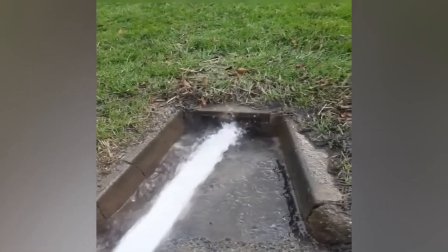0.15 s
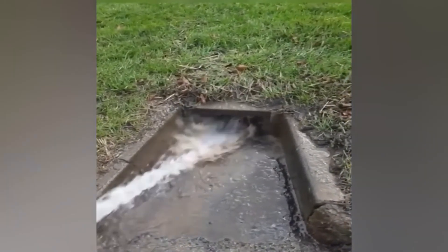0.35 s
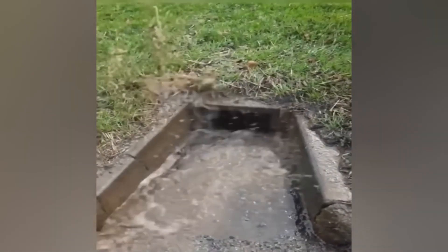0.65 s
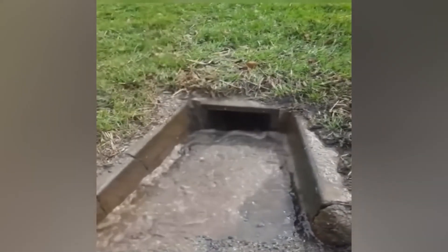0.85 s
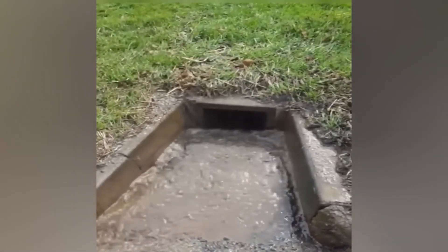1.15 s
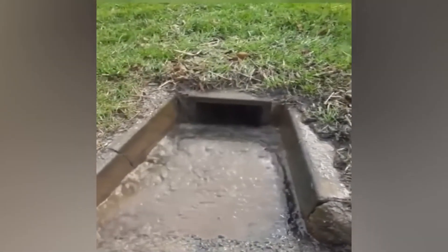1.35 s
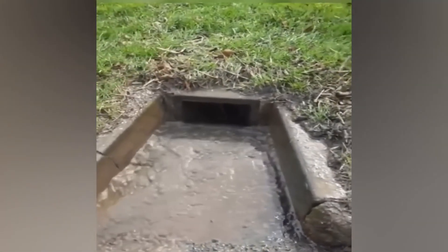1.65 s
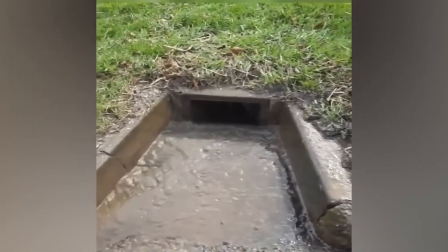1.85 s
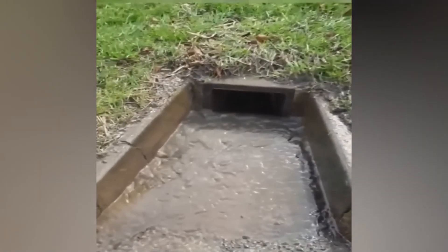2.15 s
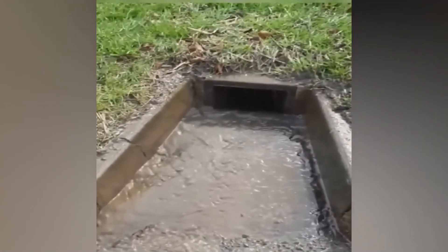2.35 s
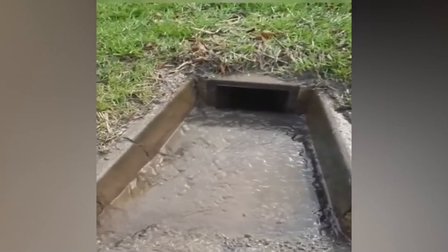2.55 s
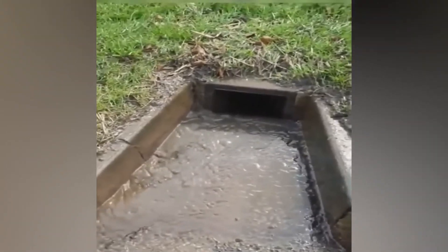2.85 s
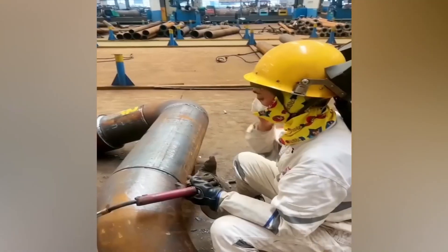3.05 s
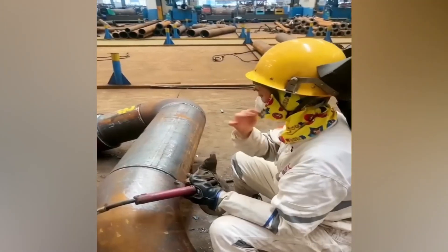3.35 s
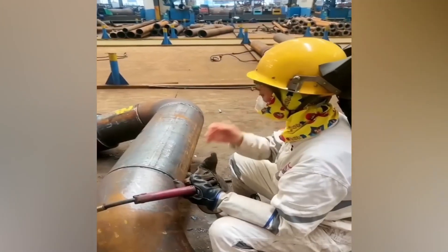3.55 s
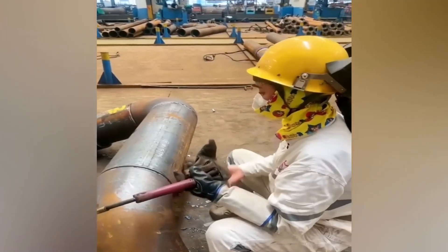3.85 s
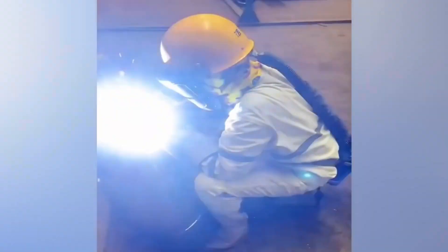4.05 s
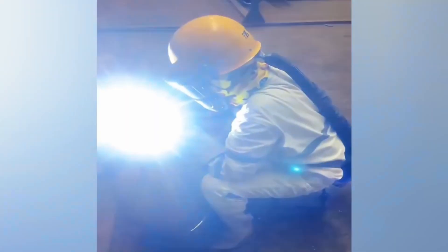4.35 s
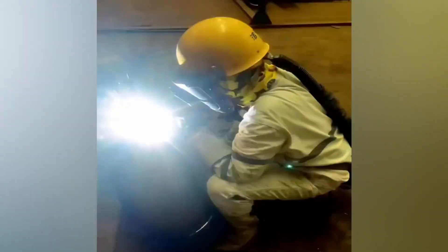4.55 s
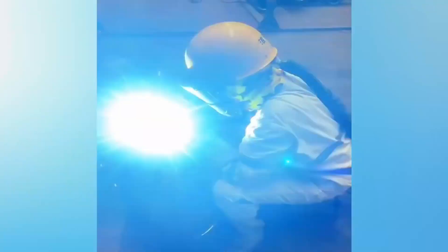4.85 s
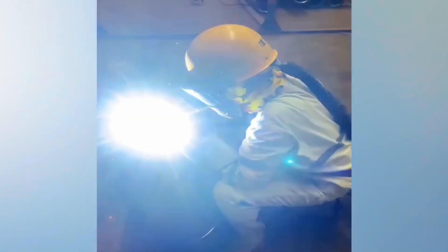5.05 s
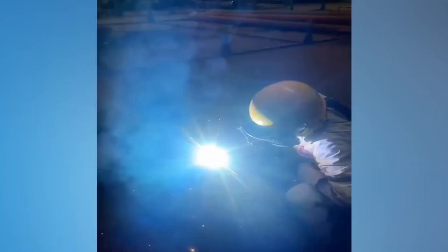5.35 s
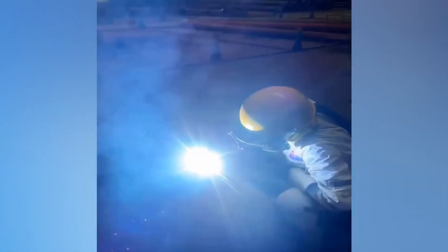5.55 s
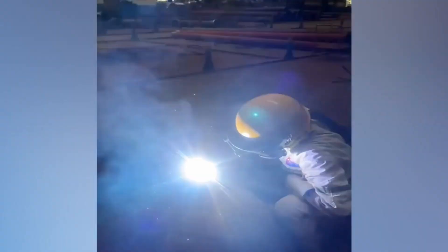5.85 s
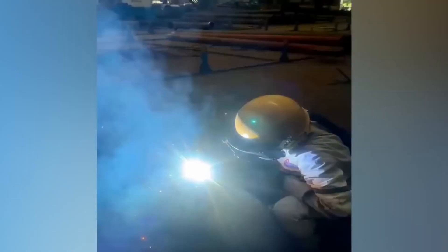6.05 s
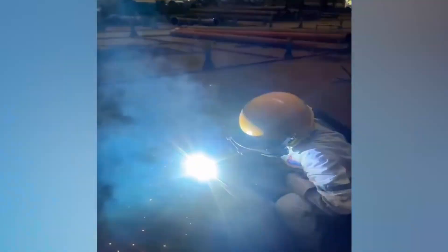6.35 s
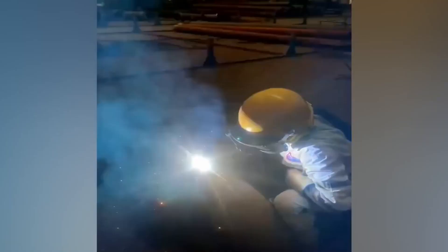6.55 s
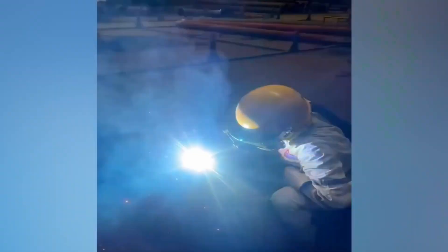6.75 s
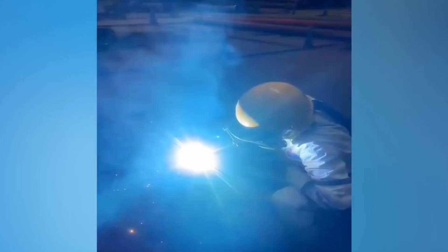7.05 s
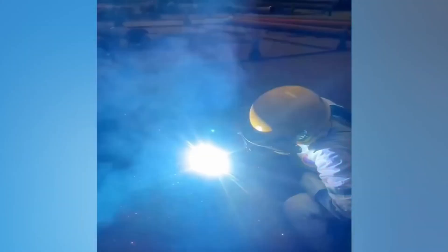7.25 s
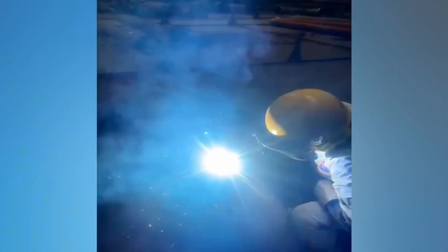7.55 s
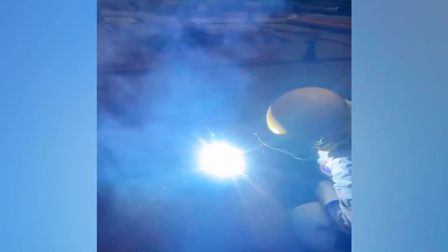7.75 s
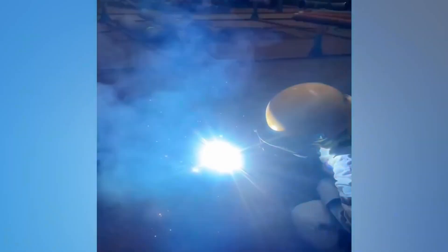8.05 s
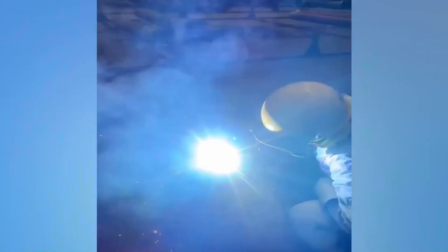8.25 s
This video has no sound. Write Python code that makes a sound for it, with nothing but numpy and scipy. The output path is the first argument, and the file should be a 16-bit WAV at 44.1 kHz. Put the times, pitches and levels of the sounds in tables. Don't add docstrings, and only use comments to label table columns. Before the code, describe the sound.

Loud wide-band spray, stronger on the right, covers engine and pump drone that slowly eases. After a brief dip and cut, a subdued hall rumbles with fans and motors for a second. Welding starts close by: hiss, sizzle and rapid irregular snaps. Another cut moves the microphone back, where the arc becomes smooth, bright hissing with only occasional clicks, in mono.

```python
import sys
import numpy as np
from scipy import signal
from scipy.fft import rfft, irfft, next_fast_len
from scipy.io import wavfile
from scipy.ndimage import uniform_filter1d

SR = 44100
rng = np.random.default_rng(int(sys.argv[2]) if len(sys.argv) > 2 else 0)


def store_wav(level_fs):
    pcm = np.round(np.clip(np.atleast_2d(level_fs), -1, 1) * 32767)
    wavfile.write(sys.argv[1], SR, pcm.T.astype(np.int16))


def gain_from_db(level_db):
    decades = np.asarray(level_db, float) / 20
    return 10 ** decades


N = 370440
CUT_S, STRIKE_S, STEP_BACK_S = 2.9255, 3.936, 5.457


def unit(x):
    return x / np.sqrt(np.mean(x ** 2) + 1e-20)


def along(points, hz):
    f, v = np.transpose(points)
    return np.interp(np.log(hz + 1), np.log(f + 1), v)


def curves(rows):
    s, *columns = np.transpose(rows)
    t = np.arange(N) / SR
    return [np.interp(t, s, column) for column in columns]


def pieces(rows):
    rows, t = np.array(rows), np.arange(N) / SR
    latest = np.clip(np.searchsorted(rows[:, 0], t) - 1, 0, None)
    row = rows[latest]
    return row[:, 1:].T, t - row[:, 0]


def wobble(rate, step=1):
    knots = rng.standard_normal(int(N * rate / SR) + 4)
    smooth = signal.resample_poly(knots, 8, 1)
    places = np.arange(0, N, step) * 8 * rate / SR
    return np.interp(places, np.arange(len(smooth)), smooth)


def blurred(field, bands, frames):
    return uniform_filter1d(uniform_filter1d(field, size=bands, axis=0), size=frames, axis=1)


def filtered(x, response):
    m = next_fast_len(N + 8192)
    return irfft(rfft(x, m) * response(np.fft.rfftfreq(m, 1 / SR)), m)[..., :N]


def rush(spectrum, patchy_db, crackle_db, channels=1):
    z = signal.stft(rng.standard_normal((channels, N)), nperseg=512)[2]
    patches = unit(blurred(rng.standard_normal(z.shape[1:]), 6, 10))
    noise = signal.istft(z * gain_from_db(patchy_db * patches), nperseg=512)[1][:, :N]
    noise = noise * gain_from_db(crackle_db * wobble(900))
    return unit(filtered(noise, lambda hz: gain_from_db(along(spectrum, hz))))


def hum(hz, width_hz):
    pitch = np.repeat(hz + width_hz * wobble(20, step=64), 64)[:N]
    size = np.repeat(gain_from_db(.8 * wobble(6, step=64)), 64)[:N]
    return np.sqrt(2) * size * np.sin(2 * np.pi * (np.cumsum(pitch) / SR + rng.random()))


# f/Hz, level/dB per Hz
SPRAY = [(5000, -34), (8500, -26), (9560, -9), (11600, -1), (12500, -3), (13900, -2.5), (15600, -15)]
NOZZLE = [(2120, -12.5), (3600, -7), (5030, -6.5), (6260, 0), (7620, -4.5), (8270, -9.5), (9200, -13),
          (12000, -27), (20200, -120)]
SPLASH = [(350, -16), (600, -3), (650, -9.5), (761, -4.5), (858, -6.5), (1290, -5), (2240, 1), (4000, -3),
          (5200, -9), (8800, -120)]
# t/s, level/dB
PRESSURE = [(0.0, -28), (0.33, -26), (0.48, -20.5), (0.54, -23), (1.17, -25), (1.23, -23), (2.77, -24),
            (2.86, -23)]


def jet():
    t = np.arange(N) / SR
    force_db = curves(PRESSURE)[0] - np.median(np.array(PRESSURE)[:, 1])
    swing_s, swing_takes_s = .47, .25
    turned = np.clip((t - swing_s) / swing_takes_s + .5, 0, 1)
    gush_s, rise_s, fall_s = 0.466, 0.059, 0.064
    gush = np.exp(-((t - gush_s) / np.where(t < gush_s, rise_s, fall_s)) ** 2)

    def strength_db(before, after, lift):
        swing_db = before + (after - before) * turned
        return swing_db + lift * gush + 0.61 * force_db * turned + 0.59 * wobble(5.15)

    spray_db = strength_db(-30.5, -23, lift=3)
    nozzle_db = strength_db(-29.5, -27, lift=4.5)
    splash_db = strength_db(-32.5, -34, lift=5)
    surge = 0.33 * wobble(14) + 0.49 * wobble(70)
    pair = gain_from_db(spray_db + surge) * rush(SPRAY, patchy_db=1.0, crackle_db=-1.0, channels=2)
    pair += gain_from_db(nozzle_db + surge + 1.4) * rush(NOZZLE, patchy_db=0.7, crackle_db=0.5, channels=2)
    pair += gain_from_db(splash_db + 0.22 * surge + 1.7) * rush(SPLASH, patchy_db=0.8, crackle_db=1.4, channels=2)
    return pair


# t/s, firing level/dB
TRUCK = [(0, -22.5), (.2, -23), (.7, -26), (1.9, -29), (2.43, -28.5), (2.86, -28.5)]
# f/Hz, level/dB per Hz
RUMBLE = [(15, -53), (25, -52), (59, -12.5), (87, -6), (109, -12.5), (134, -9), (259, -11.5), (320, -16.5),
          (383, -9), (465, -19.5), (900, -26.5), (1170, -51), (1980, -120)]
# multiple of the engine cycle, level/dB
FIRING = [(7, -19), (8, 0), (9, -20), (15, -18), (16, -13), (24, -16), (40, -26)]
# multiple of the pump's turning rate, level/dB
PLUNGER = [(2, -16), (4, -24), (5, -18), (8, -17), (10, -27)]
# f/Hz, width/Hz, level/dB
PANELS = [
    (170.6, 0.24, -11.5),
    (381.7, 4.71, -14.5),
    (785, 5.5, -27),
]


def truck():
    cycle_hz, pump_hz = 10.91, 28.74
    firing_db, = curves(TRUCK)
    nearer_db = firing_db - np.mean(TRUCK, axis=0)[1]
    rumble_db = -34.2 + 1.1 * nearer_db + 1.5 * wobble(3.07)
    lines = sum(gain_from_db(db) * hum(order * cycle_hz, 0.48) for order, db in FIRING)
    lines += sum(gain_from_db(db) * hum(order * pump_hz, 0.81) for order, db in PLUNGER)
    lines += sum(gain_from_db(db) * hum(hz, width_hz) for hz, width_hz, db in PANELS)
    rumble = gain_from_db(rumble_db + 1.5) * rush(RUMBLE, patchy_db=2.8, crackle_db=2, channels=2)
    return gain_from_db(firing_db - 0.2) * lines, rumble


# f/Hz, likeness (0 to 1)
JET_ALIKE = [(60, 1), (180, 1), (550, 0.94), (1650, 0.086), (4970, 0.31), (15000, 0.09)]
# f/Hz, left-right level/dB
JET_LEAN = [(60, -4.5), (150, -2.5), (380, -6.5), (950, -6.5), (2380, -8.0), (5980, -13), (15000, -16)]


def outdoors():
    lines, rumble = truck()
    right, other = jet() + rumble
    alike = lambda hz: np.clip(along(JET_ALIKE, hz), 0, 1)
    left = filtered(right + lines, alike)
    left += filtered(other, lambda hz: np.sqrt(1 - alike(hz) ** 2))
    left = filtered(left, lambda hz: gain_from_db(along(JET_LEAN, hz)))
    return gain_from_db(3.5) * np.array([left, right + lines])


# t/s, level/dB
ARC = [
    [(3.945, -59), (4.0, -53), (4.115, -45), (4.185, -45), (4.427, -43.5), (5.235, -52), (5.44, -49)],
    [(5.47, -41.5), (5.66, -37.5), (5.91, -43), (6.56, -38.5), (6.93, -35), (7.26, -40.5), (7.72, -39.5),
     (8.11, -42), (8.4, -39)],
]
# f/Hz, level/dB per Hz
ARC_NEAR = [(470, -50), (800, -7), (923, -4), (1280, -7.5), (1450, -16), (1740, -4), (2100, -7.5),
            (2850, 0.5), (4100, -9.5), (4830, -1.5), (6020, -2.5), (6500, -14), (7250, -0.5), (10300, -14),
            (11000, -23), (14300, -46), (22000, -120)]
ARC_FAR = [(470, -49), (800, -8.5), (1160, -1.5), (1560, -14), (2030, -4), (2240, -9), (2820, -3),
           (3220, -8.5), (3590, -3.5), (4830, -10), (5820, -4), (6360, -5.5), (8090, -1.5), (9750, -15.5),
           (11000, -14), (14300, -42), (22000, -120)]
# f/Hz, level/dB per Hz
SIZZLE = [(5290, -19), (9000, -8.5), (10200, -11.5), (12100, -10.5), (13100, -4), (14600, -3.5),
          (15200, -0.5), (15600, -10)]


def arc():
    sizzle_db, = curves(ARC[0] + ARC[1])
    t = np.arange(N) / SR
    flicker = wobble(140)
    near = gain_from_db(-37.5 + 1.3 * flicker) * rush(ARC_NEAR, patchy_db=0.4, crackle_db=1.0)[0]
    far = gain_from_db(-39 + 0.64 * flicker) * rush(ARC_FAR, patchy_db=0.3, crackle_db=0.5)[0]
    follows = 0.19
    near = near * gain_from_db(follows * (sizzle_db + 45.5))
    far = far * gain_from_db(follows * (sizzle_db + 39))
    hiss = np.where(t < STEP_BACK_S, near, far)
    sizzle = gain_from_db(sizzle_db + .9 * flicker) * rush(SIZZLE, patchy_db=1.5, crackle_db=1.5)[0]
    return (t > STRIKE_S) * (hiss + sizzle)


# t/s, level/dB, brightness/dB
POPS = [(3.9545, -30, -18), (4.1737, -26, 0), (4.2287, -31, 12), (4.4483, -30, -7), (4.5418, -25, -12),
        (4.591, -22, -17), (4.6584, -24.5, -15), (4.868, -31, -20), (4.7205, -30, -8), (4.9017, -31, -8),
        (4.92, -30, -5), (5.347, -24, -9), (4.986, -27, -16), (5.257, -18, -2), (5.2856, -30, -6),
        (5.345, -17.5, -9), (5.4235, -23.5, -17), (6.0764, -27, -1), (6.1444, -23, 1), (7.269, -27.5, -1),
        (8.0004, -24, 6), (8.2007, -25, 1.5), (8.255, -29, 0), (5.82, -30, 0), (4.698, -31, -8),
        (4.606, -31, -14)]
# touch t/s, level/dB, tear t/s, level/dB, brightness/dB
DOUBLES = [(3.9405, -29, 3.9445, -31, -12), (3.9603, -31, 3.9643, -17.5, -6), (4.016, -23, 4.0185, -22, -4),
           (4.058, -18.5, 4.0717, -26, -4), (4.1099, -28, 4.1175, -19, 0), (4.359, -24, 4.3617, -28, -3),
           (4.4068, -27, 4.41, -29, -8), (4.504, -30, 4.5063, -20, -8), (4.5851, -20, 4.5882, -20.5, -16),
           (4.633, -21, 4.6372, -19.5, -12), (4.747, -29, 4.7592, -21, -17),
           (4.9038, -25, 4.9062, -18, -16), (5.072, -18, 5.0793, -18, -9), (5.1218, -17, 5.1286, -21.5, -5),
           (5.2252, -19.5, 5.2288, -27, -7), (5.25, -25, 5.2545, -26, -2), (5.2689, -26, 5.272, -22, -10),
           (5.3383, -18.5, 5.3413, -23, -7), (5.8455, -28, 5.8493, -23, 4), (5.9121, -35, 5.923, -27, 1),
           (7.806, -29, 7.809, -23, 5)]
# f/Hz, level/dB
SPARK = [(150, -38), (600, -9), (1300, -5), (2900, 1), (4100, -7), (7300, 0), (10000, -10), (12000, -25),
         (16000, -44)]


def pops():
    dull, bright = np.zeros(N), np.zeros(N)
    t = np.arange(-300, 500) / SR
    spark = lambda lag: (t >= lag) * gain_from_db(-60 * abs(t - lag) / .0045)
    shape = spark(-.0003) + .6 * spark(.0008)
    shape += .16 * gain_from_db(-60 * abs(t) / .012) + .03 * gain_from_db(-60 * abs(t) / .05)
    spits = []
    for a, b, c in rng.random((55, 3)):
        s = STRIKE_S + a * (STEP_BACK_S - STRIKE_S)
        spits.append((s, -35.5 - 3 * np.log(1 - .9 * b), -16 * c))
    halves = []
    for touch_s, touch_db, tear_s, tear_db, bright_db in DOUBLES:
        halves += [(touch_s, touch_db, bright_db), (tear_s, tear_db, bright_db)]
    for s, db, bright_db in POPS + halves + spits:
        snap = shape * rng.uniform(-1, 1, len(t))
        snap[300 - 13] = 1.3 * np.sign(snap[0])
        snap = gain_from_db(db + 19.5) * snap / np.linalg.norm(snap)
        first = round(s * SR) - 300
        dull[first:][:len(t)] += snap * gain_from_db(-.3 * bright_db)
        bright[first:][:len(t)] += snap * gain_from_db(0.7 * bright_db)
    both = filtered(dull, lambda hz: gain_from_db(along(SPARK, hz)))
    both += filtered(bright, lambda hz: gain_from_db(along(SIZZLE, hz) + 1.0))
    return .3 * np.tanh(both / .3)


# from t/s, rumble level/dB, drone level/dB
SHOP = [
    (2.9, -47.5, -48),
    (4.0, -49, -52.5),
    (5.457, -49.5, -48.5),
]
# f/Hz, level/dB per Hz
SHOP_LOW = [(15, -38), (25, -6), (81, -2), (165, -5.5), (243, -7.5), (305, -4), (397, -12), (479, -8),
            (600, -18.5), (780, -41), (1320, -120)]
SHOP_AIR = [(240, -28), (400, -10.5), (596, -9.5), (716, -6), (944, -10.5), (1500, -14), (2100, -17.5),
            (2330, -12), (2520, -15.5), (2850, -11), (3810, -22), (7490, -23), (11200, -44.5), (13400, -30),
            (15600, -40)]
# from t/s, to t/s, f/Hz, width/Hz, level/dB
MOTORS = [(2.973, 4.0, 64.9, 2, -49.5), (4.0, 5.45, 65.2, 3, -54), (2.91, 2.96, 1850, 90, -51),
          (2.98, 4.0, 310.4, 1.6, -51.5), (4.0, 5.45, 309, 1.2, -49.5), (2.98, 5.45, 353, 1.2, -55),
          (2.98, 3.998, 705, 5.1, -59), (2.981, 4.0, 778, 6, -60), (5.466, 8.397, 156.4, 2.5, -53.5),
          (5.465, 7.3, 896, 2, -56.5), (5.468, 8.4, 300.4, 3.8, -53.5), (5.477, 8.4, 309.3, 4.92, -51.5),
          (2.98, 4.0, 154.8, 10.4, -52), (4.0, 4.75, 905, 3, -58), (7.0, 7.6, 503, 4.1, -58),
          (7.78, 8.196, 500, 1.2, -51.5)]


def shop():
    rumble_db, drone_db = pieces(SHOP)[0] + .7 * np.array([wobble(2.98), wobble(2.98)])
    t = np.arange(N) / SR
    bed = gain_from_db(rumble_db + 2.0) * rush(SHOP_LOW, patchy_db=1.5, crackle_db=1.5)[0]
    bed += gain_from_db(drone_db + 3) * rush(SHOP_AIR, patchy_db=0.5, crackle_db=-1.0)[0]
    for start, end, hz, width_hz, db in MOTORS:
        running = uniform_filter1d(1. * ((t > start) & (t < end)), size=900)
        bed += gain_from_db(db) * hum(hz, width_hz) * running
    return bed


# [(f/Hz, drift/Hz per s, width/Hz, level/dB)]
PATHS = [(.04, .19, [(3530, 200, 50, -20)]), (.42, .52, [(2900, -500, 50, -18)]),
         (2.8, 2.87, [(2700, 0, 70, -20)]), (0, .33, [(3550, 0, 35, -6), (13100, 250, 90, -10),
         (2350, 0, 350, 5.5), (620, 0, 150, 5.5), (4200, 0, 700, -2)]),
         (1.42, 1.55, [(2850, -2500, 50, -14)]), (2.17, 2.24, [(2520, 0, 60, -14)]),
         (.8, 1.03, [(3350, 1000, 50, -12)]), (1.12, 1.22, [(2720, 0, 40, -14)]),
         (.38, .55, [(2200, 0, 250, 4.5), (4900, 0, 250, 4), (5700, 0, 300, 2), (6400, 0, 120, 3),
         (3800, 0, 300, -2)]), (.38, 2.9, [(2900, -140, 40, -11), (2100, 0, 300, 1), (3700, -200, 35, -6),
         (1700, -150, 30, -5), (1250, 0, 30, -5), (12250, 20, 90, -5), (11800, 0, 200, 3)]),
         (2.05, 2.35, [(8250, -170, 110, -20)]), (0, 2.9, [(15330, 0, 70, 6)])]
HALL_PATHS = [
    (2.92, 2.95, [(13500, 0, 1500, -8), (4400, 0, 1100, 12), (11000, 0, 1300, 14), (200, 0, 200, 6), (6900, 0, 700, -12)]),
    (3.93, 5.46, [(410, 0, 25, -5), (255, 0, 20, -4), (4200, 0, 150, -3), (4900, 0, 200, 2), (5400, 0, 130, -4), (7900, 0, 110, -2), (9000, 0, 200, -4), (8400, 0, 150, 3), (10300, 0, 300, 3)]),
    (5.46, 8.4, [(2250, 0, 40, -7), (4750, 17, 45, -8), (4200, 50, 70, -4), (6200, 120, 80, -4), (5300, 70, 70, -4), (7850, -85, 70, -3), (8250, -80, 200, 1.5)]),
    (6.3, 7.3, [(8150, 0, 220, 3), (7300, 0, 150, 3)]),
    (7.45, 8.4, [(7850, -60, 230, 2.5), (7100, 0, 150, 2)]),
    (5.46, 6.1, [(6850, 0, 200, 6), (7600, 0, 120, 3), (5900, 0, 120, 3)]),
]


def reflected(x):
    hz, t, z = signal.stft(x, SR, nperseg=1024, noverlap=768)
    hz = hz[:, None]
    wander = lambda rate: np.resize(wobble(rate, step=256), len(t))
    scatter = blurred(rng.standard_normal(z.shape[1:]), 1, 24)
    gain_db = 2.4 * unit(scatter) * (hz > 450)
    for start, end, paths in PATHS + HALL_PATHS:
        for first_hz, drift, width_hz, db in paths:
            centre = first_hz + drift * (t - start) + .5 * width_hz * wander(5)
            sway = .8 if width_hz < 100 else .25
            depth_db = db * np.clip(.9 + sway * wander(12), 0, 2.5) * (t > start) * (t < end)
            gain_db += depth_db * np.exp(-.5 * ((hz - centre) / width_hz) ** 2)
    return signal.istft(z * gain_from_db(gain_db), SR, nperseg=1024, noverlap=768)[1][:, :N]


# from t/s, level/dB, slope/dB per s
SPLICE = [(-1, 0, 0), (2.864, -7, 0), (2.873, 1, 0), (2.879, -9, -800), (2.9265, 0, 0), (2.947, -120, 0),
          (2.973, -60, 4000), (2.985, -8, 900), (2.994, 0, 0), (5.446, -23, 0), (5.4545, -12, 0),
          (5.4565, -33, 700), (5.468, 0, 0)]


def splice():
    (db, slope), since = pieces(SPLICE)
    gain = gain_from_db(db + slope * since * (slope != 0))
    return uniform_filter1d(gain, size=60), np.arange(N) / SR < CUT_S


def scene():
    gain, outside = splice()
    places = np.where(outside, gain * outdoors(), shop() + arc())
    return reflected(places) + pops()


# from t/s, to t/s
TOP_GAPS = [(.53, .72), (.77, .83), (.98, 1.03), (1.12, 1.18), (1.38, 1.81), (2.28, 2.32), (2.5, 2.65)]


def starved(x):
    hz, t, z = signal.stft(x, SR, nperseg=1024)
    column = hz[:, None]

    def blocks(bands, frames):
        luck = rng.random((len(hz) // bands + 1, len(t) // frames + 1))
        return np.repeat(np.repeat(luck, bands, 0), frames, 1)[:len(hz), :len(t)]

    cell = uniform_filter1d(uniform_filter1d(abs(z) ** 2, size=2, axis=1), size=3, axis=2)
    keep = (cell > gain_from_db(-15) * uniform_filter1d(cell, size=25, axis=1)) | (column < 1700)
    streaks = uniform_filter1d(rng.standard_normal(keep.shape[1:]), size=6, axis=1)
    keep &= (unit(streaks) < 2.1) | (column < 900)
    share = np.interp(hz, [2980, 6000, 11800, 14600, 15000], [0, .22, .3, .6, .97])[:, None]
    keep[0] &= (blocks(6, 4) > share) | (t > 2.9)
    gap = sum((t > a) & (t < b) for a, b in TOP_GAPS) > 0
    keep[:, (hz > 14600) & (abs(hz - 15330) > 90)] &= ~gap
    keep[:, hz > 15780] = False
    swapped = (blocks(32, 3) < .04) & (column > 5000) & (t > STRIKE_S)
    z[1] *= np.where(swapped, np.exp(2j * np.pi * rng.random(swapped.shape)), 1)
    return signal.istft(z * keep, SR, nperseg=1024)[1][:, :N]


def roll_off(x):
    return signal.sosfilt(signal.butter(12, 15780, fs=SR, output="sos"), x)


def record(dry):
    gain, outside = splice()
    mix = starved(dry) * np.where(outside, 1, gain)
    return roll_off(mix)


dry = scene()
out = record(dry)
store_wav(out)
```